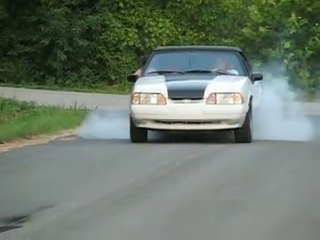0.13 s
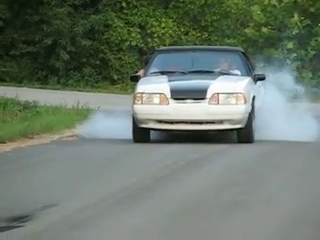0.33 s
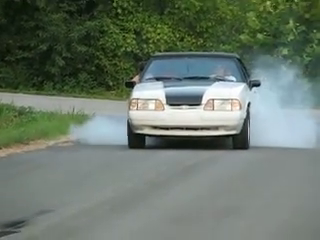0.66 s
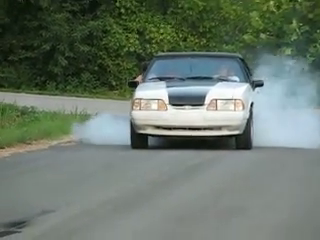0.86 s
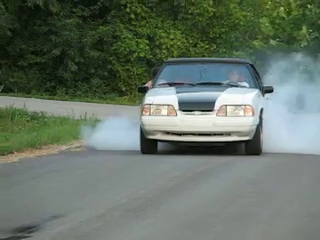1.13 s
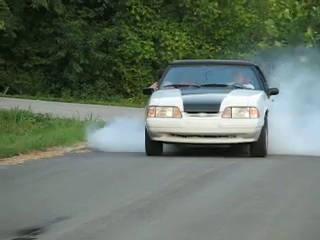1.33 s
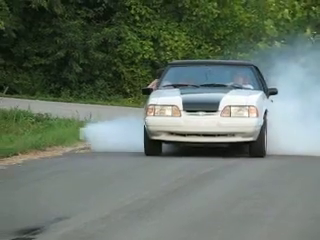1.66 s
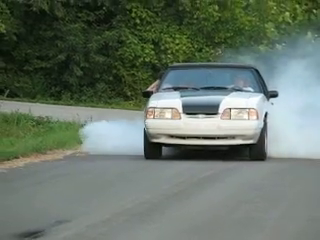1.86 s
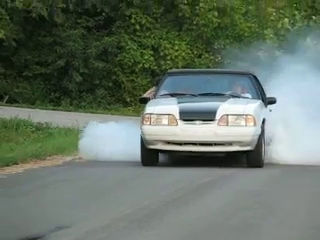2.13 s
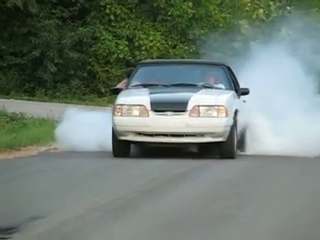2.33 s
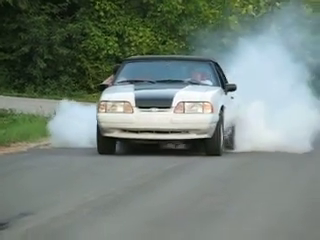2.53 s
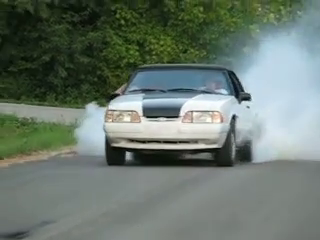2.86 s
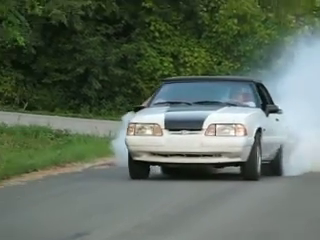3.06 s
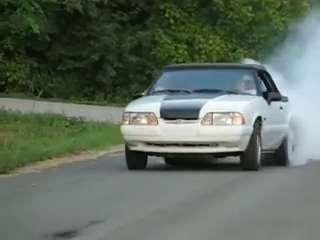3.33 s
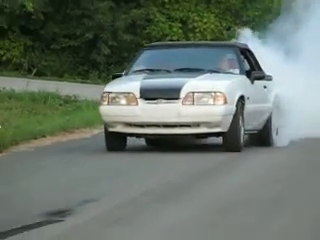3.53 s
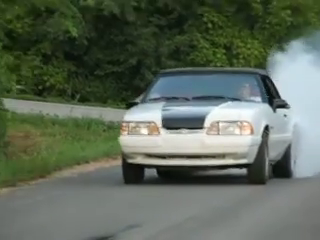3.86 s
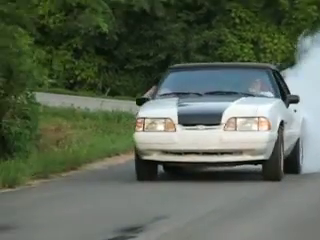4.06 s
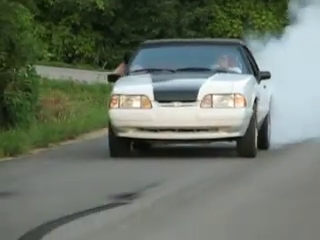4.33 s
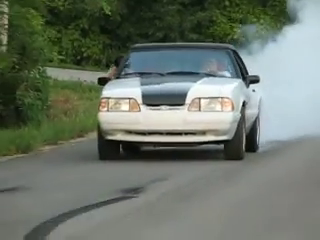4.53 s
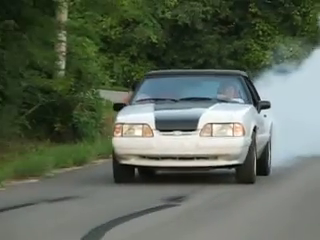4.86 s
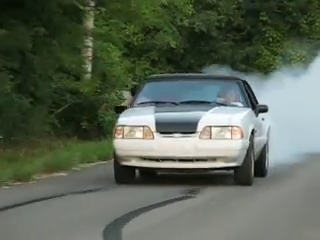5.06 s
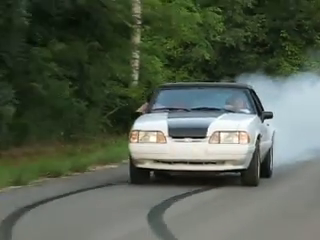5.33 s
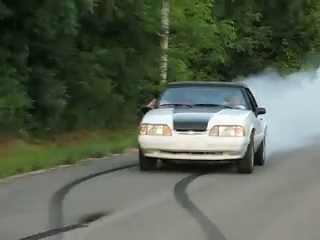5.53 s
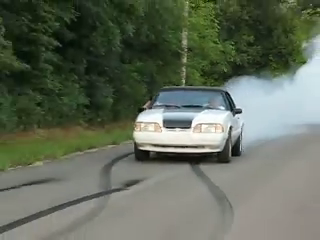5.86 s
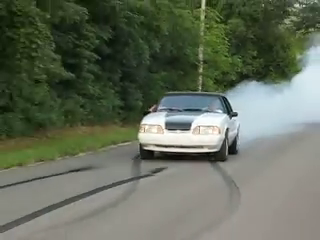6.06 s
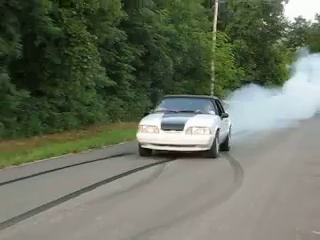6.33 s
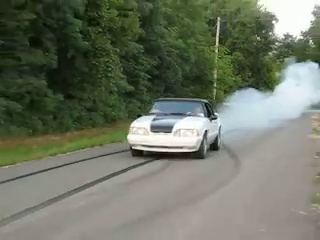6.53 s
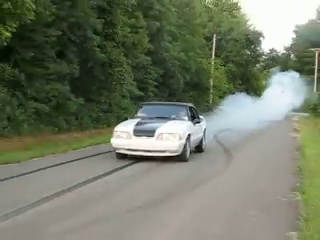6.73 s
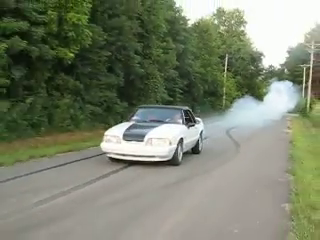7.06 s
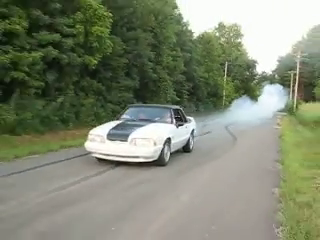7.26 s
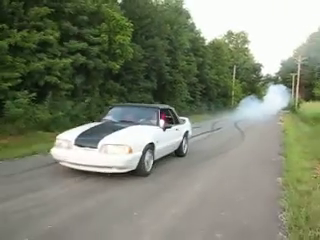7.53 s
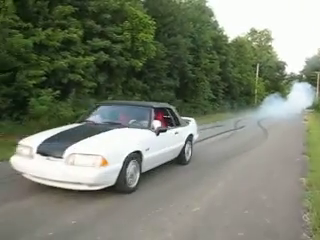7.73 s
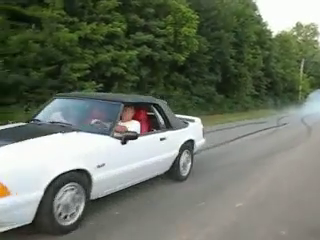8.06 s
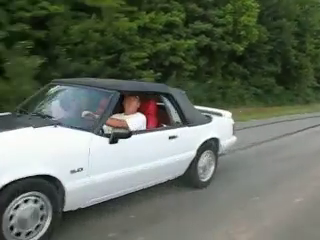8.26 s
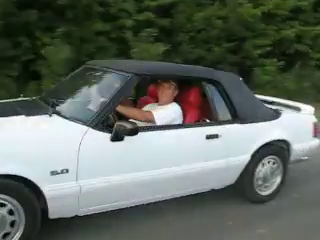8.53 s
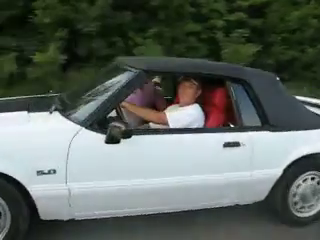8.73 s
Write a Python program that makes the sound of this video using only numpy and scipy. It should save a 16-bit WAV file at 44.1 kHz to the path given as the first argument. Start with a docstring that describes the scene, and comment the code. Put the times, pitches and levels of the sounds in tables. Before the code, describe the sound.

A car engine revs hard through a burnout, tyres roaring and squealing, then the car drives up and coasts past with a droning exhaust.

```python
"""A V8 engine revs up over the roar of its rear tyres spinning on a country road. The tyres squeal as they
grip again, then the car drives up and coasts past, its exhaust pipes droning in bursts.
The exhaust, fan and thin whines are tones that follow engine speed; burble, rumble, roar and hiss are
noise. The squeal is rubber sticking and slipping.
Two close microphone ports (openings) hear the bass alike and the treble differently."""
import sys
import numpy as np
from scipy import signal
from scipy.fft import rfft, irfft, next_fast_len
from scipy.io import wavfile
from scipy.ndimage import map_coordinates

SR = 44100
rng = np.random.default_rng(int(sys.argv[2]) if len(sys.argv) > 2 else 0)


def waveform_to_disk(signal):
    """Save audio, clipped to [-1, 1], as 16-bit WAV at the path in sys.argv[1]."""
    frames = np.transpose(np.atleast_2d(signal))
    scaled = np.clip(frames, -1, 1) * 32767
    samples = np.round(scaled).astype(np.int16)
    wavfile.write(sys.argv[1], SR, samples)


N = 392490
TIME = np.arange(N) / SR
PADDED = next_fast_len(N + 2000)
BINS_HZ = np.arange(PADDED // 2 + 1) * SR / PADDED + 1


def amp(db):
    """Turn decibels into a gain to multiply by."""
    return np.exp(np.asarray(db) * (np.log(10) / 20))


def rms_one(x):
    """Scale a signal to an average strength (rms) of 1."""
    return x / np.sqrt(np.mean(np.abs(x) ** 2) + 1e-20)


def in_time(rows):
    """Join a table's rows with straight lines: one curve for each column after the time."""
    times, *columns = np.transpose(rows)
    return [np.interp(TIME, times, column) for column in columns]


def at_hz(rows, hz):
    """Read between a table's rows on a musical (log) frequency scale."""
    frequencies, values = np.transpose(rows)
    return np.interp(np.log(hz), np.log(np.maximum(frequencies, 1)), values)


def span(start_s, end_s, fade_s):
    """A gain that fades in after the start and out before the end."""
    return np.clip(np.minimum(TIME - start_s, end_s - TIME) / fade_s, 0, 1)


def drift(rate_hz, size=N):
    """A smooth random wobble of typical size 1, worked out at every 20th sample."""
    r = np.exp(-2 * np.pi * rate_hz * 20 / SR)
    slow = signal.lfilter([1], [1, -2 * r, r * r], rng.standard_normal(N // 20 + 3002))[3000:]
    return np.interp(np.arange(size) / 20, np.arange(len(slow)), rms_one(slow))


def tone(turns, db, flutter_db):
    """A sine whose level flutters slowly and shivers fast; turns counts its cycles so far."""
    flutter = drift(2.34, len(turns)) + 0.58 * drift(25, len(turns))
    return np.sqrt(2) * amp(db + flutter_db * flutter) * np.sin(2 * np.pi * (turns + rng.random()))


def add_tone(out, start_s, end_s, fade_s, turns, db, flutter_db):
    """Mix in a tone that fades in and out."""
    part = slice(int(start_s * SR), int(end_s * SR))
    out[part] += span(start_s, end_s, fade_s)[part] * tone(turns[part], db, flutter_db)


# How alike noise is at the two ports: f/Hz, likeness (1 = the same)
LIKENESS = [(30, 0.91), (100, 1), (700, 0.995), (1200, 0.97), (1900, 0.93), (2500, .82), (4100, 0.72),
            (5300, .52), (8500, 0.5), (11000, .33), (15000, 0.2)]
def white():
    """Left and right spectra of white noise, less alike in the treble."""
    mid, side = rfft(rng.standard_normal((2, PADDED)))
    alike = np.clip(at_hz(LIKENESS, BINS_HZ), 0, 1)
    return np.sqrt(1 + alike) * mid + np.sqrt(1 - alike) * side * [[1], [-1]]


def noise(spectra, colour, flicker_db):
    """Give white noise a colour (its balance of low and high) and a flickering level."""
    coloured = irfft(amp(at_hz(colour, BINS_HZ)) * spectra, PADDED)[:, :N]
    return rms_one(coloured) * amp(flicker_db * drift(11.4))


# The cylinders firing: t/s, firing f/Hz, firing tone level/dB, its octave's level/dB
ENGINE = [(0, 197.6, -18.5, -57), (.3, 213, -26, -53), (.6, 234.9, -27, -42.5), (.95, 256.5, -23, -35),
          (1.36, 289, -28.5, -44), (1.55, 299.5, -23.5, -36), (1.8, 309.8, -26, -36),
          (1.97, 309, -25, -36.5), (2.15, 301, -23.5, -40), (2.5, 284.3, -27, -37), (2.8, 265.6, -33, -48),
          (3.3, 243.2, -39.5, -49), (3.77, 220.4, -46, -60), (4.05, 205.6, -27, -61), (4.2, 192, -17, -39),
          (4.36, 178, -9, -32), (4.5, 169.8, -11, -27.5), (4.66, 170.3, -10.5, -28),
          (4.9, 176.3, -9.5, -26), (5.3, 186.3, -13, -37.5), (5.58, 190.6, -14, -40),
          (5.88, 187.2, -11.5, -36.5), (6.03, 186.7, -14.5, -45), (6.45, 176.6, -14.5, -38),
          (6.64, 164.4, -11, -36), (6.8, 153.3, -14, -41), (7.0, 145, -16.5, -33.5),
          (7.24, 129.4, -20.5, -44), (7.4, 117.4, -27, -38), (7.84, 97.8, -32, -36), (8.3, 73.1, -35, -26),
          (8.6, 60.4, -26, -22.5), (8.9, 51.84, -19, -24.5)]
# Base level of the lesser engine tones and the fan: t/s, level/dB
LESSER_LEVEL = [(0, -21), (1, -19.5), (2.5, -19.5), (2.9, -26), (3.5, -39), (4.4, -31.5), (5.1, -31),
                (6, -26), (6.9, -27), (7.8, -24.5), (8.9, -26)]
# Lesser engine tones: order (cycles per two engine turns), relative level/dB
LESSER_ORDERS = [(1, 2), (2, 4), (3, 0), (4, -2), (5, -2), (6, 4), (7, -7), (9, -2), (10, -6), (11, -8),
                 (12, -2), (13, -7), (14, 2), (15, -8), (17, -9), (18, 2), (19, -10), (20, 2), (21, -8),
                 (22, -1), (23, 4), (24, 0), (26, 2), (32, -3)]
# How the exhaust pipe colours those tones: f/Hz, relative level/dB
PIPE_COLOUR = [(20, -21), (60, -11), (110, -15.5), (160, 3), (200, -5.5), (300, -1.5), (400, -14.5),
               (560, -17), (690, -5.5), (780, -12.5), (880, -12.5), (980, -15)]
def exhaust(firing_hz, firings):
    """Eight firings every two engine turns make a note, with lesser tones around it and overtones."""
    _, firing_db, octave_db = in_time(ENGINE)
    lesser_db = in_time(LESSER_LEVEL)[0] - 10
    out = tone(firings, firing_db, flutter_db=0.5) + tone(2 * firings, octave_db, flutter_db=1.5)
    for order, db in LESSER_ORDERS:
        ratio = order / 8
        out += tone(ratio * firings, lesser_db + db + at_hz(PIPE_COLOUR, ratio * firing_hz), flutter_db=2)
    return out


# The fan's overtones: multiple of the blade rate, relative level/dB
FAN_OVERTONES = [(2, -3.5), (3, -14), (4, -12), (5, -11.5), (6, -9.5), (7, -9.5)]
# How the housing round the fan colours them: f/Hz, relative level/dB
HOUSING_COLOUR = [(200, 0), (320, -14.5), (385, -2.5), (430, -14.5), (570, -5.5), (800, -6), (950, -13.5),
                  (1300, -20)]
def fan(firing_hz, firings):
    """The cooling fan's passing blades hum; their lowest tone grows with engine speed."""
    blades_per_firing, full_speed_hz, db_per_octave = .669, 310, 3.5
    base_db = in_time(LESSER_LEVEL)[0]
    blade_db = base_db - 5.5 + db_per_octave * np.log2(firing_hz / full_speed_hz)
    out = tone(blades_per_firing * firings, blade_db, flutter_db=2.5)
    for multiple, db in FAN_OVERTONES:
        ratio = multiple * blades_per_firing
        housing_db = at_hz(HOUSING_COLOUR, ratio * firing_hz)
        out += tone(ratio * firings, base_db + db + housing_db, flutter_db=2.94)
    return out


# The two low noises: t/s, burble base level/dB, rumble level/dB
LOW_LEVELS = [(0, -28, -52), (1.7, -42, -43), (2.5, -43, -46), (2.9, -26, -50), (3.35, -34, -66),
              (3.9, -31.5, -52), (4.5, -32, -48), (5.1, -32, -42), (5.6, -27, -35), (6.1, -27, -40),
              (6.8, -28, -33), (7.08, -24, -34), (7.3, -17, -30), (7.55, -31, -34), (8, -17.5, -33),
              (8.35, -30, -26), (8.9, -22, -30)]
# Notes the pipes ring at: f/Hz, width/Hz, relative level/dB
PIPE_RINGS = [(170.9, 6.9, -3.5), (275, 53, -7), (373, 83, -46)]
def burble():
    """Uneven burning makes lumpy noise that sets the pipes ringing."""
    level_db, _ = in_time(LOW_LEVELS)
    lumps = rng.standard_normal(N) * amp(1.5 * drift(20))
    out = np.zeros(N)
    for hz, width_hz, db in PIPE_RINGS:
        r = np.exp(-np.pi * width_hz / SR)
        ring = signal.lfilter([1, 0, -1], [1, -2 * r * np.cos(2 * np.pi * hz / SR), r * r], lumps)
        out += amp(db) * rms_one(ring)
    return amp(level_db) * signal.sosfilt(signal.butter(2, 700, fs=SR, output="sos"), out)


# Colour of the rumble: f/Hz, relative level/dB
RUMBLE_COLOUR = [(18, -7), (30, -12), (60, 7.5), (120, 2), (250, -1), (400, 2.5), (600, -29)]
def rumble(spectra):
    """Deep noise that swells and sinks under the engine."""
    _, level_db = in_time(LOW_LEVELS)
    return amp(level_db) * noise(spectra, RUMBLE_COLOUR, flicker_db=1)


# The two broad noises: t/s, roar level/dB, hiss level/dB
BROAD_LEVELS = [(0, -22.5, -26), (.38, -20.5, -23), (1, -20.5, -24), (1.8, -21, -23.5), (2.45, -21, -22.5),
                (2.7, -22.5, -26), (2.97, -37, -30), (3.69, -40, -34), (3.92, -35, -35.5),
                (4.3, -35.5, -31.5), (5.1, -34, -32.5), (5.55, -28, -25.5), (5.85, -28.5, -26),
                (6.15, -24, -26), (6.52, -24, -25), (6.69, -27.5, -30), (6.89, -23, -26.5),
                (7.61, -24.5, -26), (7.86, -21.5, -22.5), (8.06, -22, -23.5), (8.3, -23.5, -23.5),
                (8.6, -24.5, -22.5), (8.9, -25, -24)]
# One colour a stage (spin-up, full spin, pulling away, coasting, passing): f/Hz, relative level/dB
ROAR_COLOURS = [
    [(190, -22), (330, 0), (374, -26), (459, -7.5), (617, -15), (691, -3.5), (929, -12), (1090, -1.5),
     (1350, -1), (1640, -10.5), (1900, -6.5), (5000, -19), (6500, -39), (11000, -120)],
    [(190, -15), (330, 0.5), (357, -13), (396, -4), (454, -7.5), (766, -2), (1060, -7), (1340, -1),
     (1590, -6.5), (1990, -3.5), (2200, -5), (5000, -12), (6500, -40), (11000, -120)],
    [(250, -32), (420, -19), (533, -1.5), (841, 2.5), (1080, -3), (1350, 1.5), (1700, -5), (2090, -2.5),
     (2470, -10.5), (3140, -10), (5000, -16.5), (6500, -36), (11000, -120)],
    [(250, 1), (420, -1), (528, -31), (591, -7), (877, 1.5), (1310, -8), (1570, -3.5), (1910, -8.5),
     (2200, -7), (2630, -12.5), (5000, -15.5), (6500, -59), (11000, -120)],
    [(190, -18), (330, -1.5), (439, -6), (646, -12), (707, -15.5), (1030, -10), (1140, -14), (1310, -11.5),
     (1500, -16), (2160, -14.5), (3030, -17), (3280, -17), (5000, -17), (6500, -51), (11000, -120)],
]
# When the colour starts or stops changing: t/s
STAGE_TIMES = [.5, 1.7, 2.6, 2.95, 6.4, 7.1, 7.6, 7.95]
# The stage at each of those times: number, from 0
STAGES = [0, 1, 1, 2, 2, 3, 3, 4]
def roar():
    """Noise from the tyre tread and the engine's air intake, blending from one colour to the next."""
    level_db, _ = in_time(BROAD_LEVELS)
    stage, spectra = np.interp(TIME, STAGE_TIMES, STAGES), white()
    return amp(level_db) * sum(np.clip(1 - abs(stage - k), 0, 1) * noise(spectra, colour, flicker_db=0.75)
                               for k, colour in enumerate(ROAR_COLOURS))


# Colour of the hiss: f/Hz, relative level/dB
HISS_COLOUR = [(2240, -13.5), (3800, -4), (4840, -5.5), (5300, -1.5), (7030, 2), (7400, -1.5), (9310, -22),
               (11400, -24), (15000, -37)]
def hiss(spectra):
    """Bright noise on top of the roar."""
    _, level_db = in_time(BROAD_LEVELS)
    return amp(level_db) * noise(spectra, HISS_COLOUR, flicker_db=0.75)


# How hard the tread slips: t/s, squeal base level/dB, scrub level/dB
SLIP = [(2.4, -24, -21), (2.5, -20, -22), (2.62, -16.5, -30), (2.69, -16, -25), (2.745, -24, -26),
        (2.8, -14.5, -21.5), (3.1, -15.5, -18), (3.55, -17, -17.5), (3.88, -20.5, -19.5), (4.05, -20, -20),
        (4.3, -30.5, -28.5), (4.5, -50, -34), (4.6, -52, -49)]
# Squealing tread blocks: start t/s, end t/s, start f/Hz, settled f/Hz, start and end relative level/dB
SQUEALS = [(2.57, 4.45, 2080, 1735, -1.5, -6), (2.46, 3.04, 1785, 1705, -1, -2.5),
           (2.98, 3.54, 1730, 1700, -9, -23), (2.9, 4.45, 1515, 1405, -11.5, -4.5),
           (2.86, 4, 2480, 2330, -12, -25.5), (3.05, 3.55, 3250, 2950, -14, -6.5),
           (3.05, 3.5, 4480, 4800, -22, -23), (0.26, 0.44, 1310, 760, -5, -4),
           (0.31, 0.49, 1100, 1070, -4, -4), (1.1, 2.2, 1355, 1370, -7, -6)]
# How each squeal breaks up: relative depth, wobble f/Hz
BREAKUP = [(.25, 60), (.4, 60), (.7, 60), (.45, 30), (1.6, 90), (1.6, 130), (2.5, 200), (.2, 30), (.2, 30),
           (.5, 30)]
# Grip coming and going: t/s, factor on that depth
RAGGEDNESS = [(2.4, 2), (2.9, 2.2), (3.05, .7), (3.75, .8), (4, 2.2), (4.5, 2.5)]
def squeal():
    """Tread blocks stick and slip, making ragged tones whose pitch settles as the tyres slow."""
    settle_s = .55
    out, ragged = np.zeros((2, N)), in_time(RAGGEDNESS)[0]
    base_db, _ = in_time(SLIP)
    for (start, end, start_hz, settled_hz, start_db, end_db), (depth, wobble_hz) in zip(SQUEALS, BREAKUP):
        hz = settled_hz + (start_hz - settled_hz) * np.exp(-np.maximum(TIME - start, 0) / settle_s)
        turns = np.cumsum(hz * (1 + .004 * ragged * drift(15))) / SR
        note = np.exp(2j * np.pi * turns)
        broken = depth * ragged
        wobble = drift(wobble_hz) + 1j * drift(wobble_hz)   # complex: shakes both strength and pitch
        shake = (1 + broken * wobble) / np.sqrt(1 + 2 * broken ** 2)
        db = base_db + np.interp(TIME, [start, end], [start_db, end_db]) + 0.57 * drift(5)
        gain = np.sqrt(2) * span(start, end, fade_s=0.074) * amp(db)
        for side in (0, 1):
            fuzz = 0.22 * drift(110)   # reaches each port by its own path
            out[side] += gain * np.real((shake + fuzz) * note)
    # The slip is lopsided, which adds octaves and tones at the sum of two pitches.
    overtones = signal.sosfilt(signal.butter(2, 2600, "high", fs=SR, output="sos"), out ** 2)
    return out + 0.65 * overtones


# Thin whines and engine tones: start t/s, end t/s, firing-rate multiple at start, at end, peak level/dB
THIN_TONES = [(1.15, 1.6, 6.68, 6.62, -32), (1.55, 1.85, 6.68, 6.7, -37), (1.84, 2.5, 6.62, 7.2, -36),
              (1.4, 1.75, 15.3, 14.4, -42), (1.25, 1.6, 18.5, 18.4, -38), (1.55, 2.15, 17.25, 17.25, -34),
              (1.5, 2.1, 9.0, 9.0, -36), (1.95, 2.3, 14.15, 14.6, -37), (2.4, 2.95, 3.27, 3.3, -33.5),
              (2.28, 2.65, 18.3, 19.1, -36), (6, 6.6, 17.1, 17, -39.5), (7.851, 8.352, 7.4, 7.26, -29.5)]
def thin_tones(firing_hz):
    """Thin whines and engine tones that swell and fade, following engine speed."""
    out = np.zeros(N)
    for start, end, first, last, db in THIN_TONES:
        turns = np.cumsum(firing_hz * np.interp(TIME, [start, end], [first, last])) / SR
        add_tone(out, start, end, (end - start) / 3, turns, db, flutter_db=2.5)
    return out


# Colour of scrubbing rubber: f/Hz, relative level/dB
SCRUB_COLOUR = [(590, -61), (1000, -26), (1130, -17), (1230, -8), (1330, -6), (1410, -7), (1530, -2),
                (1780, 6), (1860, 2), (2200, -21.5), (2570, -10.5), (3060, -5), (3640, -5.5), (4000, -20),
                (5000, -17.5), (6500, -30), (11000, -120)]
def scrub():
    """Slipping rubber scrubs the road, making noise under the squeal."""
    _, level_db = in_time(SLIP)
    fade = span(SLIP[0][0], SLIP[-1][0], fade_s=0.27)
    return fade * amp(level_db) * noise(white(), SCRUB_COLOUR, flicker_db=1.37)


# Bursts of pipe tone: start t/s, length/s, f/Hz, level/dB
DRONE_BURSTS = [(6.884, 0.13, 158.2, -17.5), (7.057, .12, 158, -22), (7.073, .08, 291, -24),
                (7.227, .14, 156.2, -16.5), (7.408, .22, 157.2, -12.5), (7.486, 0.063, 291, -21),
                (7.602, .24, 290.4, -26), (7.62, .22, 157, -24), (7.886, 0.2, 160.6, -19),
                (7.878, 0.043, 291.6, -15), (7.927, 0.11, 291, -29), (8.137, .17, 157, -17.5),
                (8.134, .15, 291, -24), (8.4, 0.46, 156.4, -28), (8.743, 0.096, 291, -22.5),
                (8.82, .12, 156.4, -20)]
def drone():
    """With the driver's foot off the pedal, the pipes drone in bursts at their own wavering pitch."""
    out, fade_s = np.zeros(N), 0.033
    wavering_time = np.cumsum(1 + 0.01196 * drift(4.13)) / SR
    for start, length, hz, db in DRONE_BURSTS:
        add_tone(out, start, start + length, fade_s, hz * wavering_time, db, flutter_db=0.6)
    return out


def scene():
    """All the car's sounds added together, left and right."""
    firing_hz = in_time(ENGINE)[0]
    firings = np.cumsum(firing_hz * (1 + .002 * drift(7.7))) / SR   # running count, slightly unsteady
    engine = exhaust(firing_hz, firings) + fan(firing_hz, firings) + burble()
    spectra = white()
    noises = rumble(spectra) + roar() + hiss(spectra)
    return engine + noises + squeal() + thin_tones(firing_hz) + scrub() + drone()


# How much louder the left port is than the right: f/Hz, level/dB
PORT_BALANCE = [(60, 0.77), (1400, -0.5), (1900, -1), (2500, -7), (3200, -6), (4100, 2), (5300, 2),
                (6700, 1), (8500, -5.5), (10700, 6.5), (13500, 1)]
# How far the left port's wave is ahead: f/Hz, phase/radians
PORT_PHASE = [(20, -0.06), (900, -0.06), (1400, -0.17), (1900, -0.53), (2500, -0.5), (3200, .55),
              (4100, 0.72), (5300, 0.63), (6700, 0.5), (8500, 0.1), (10700, 0.8), (13500, 0)]
def record(dry):
    """The two ports differ in colour and timing; peaks are rounded and the highest treble is cut."""
    passing_s, left_lead_s, cutoff_hz = (7.5, 8.8), 85e-6, 15660
    # The passing car swings to the left, so its sound reaches that port first.
    shift = np.interp(TIME, passing_s, [0, left_lead_s * SR / 2])
    arrived = [map_coordinates(port, [np.arange(N) + sign * shift], order=3, mode="mirror")
               for port, sign in zip(dry, (1, -1))]
    left_gain = amp(at_hz(PORT_BALANCE, BINS_HZ) / 2) * np.exp(.5j * at_hz(PORT_PHASE, BINS_HZ))
    padded = np.pad(arrived, ((0, 0), (1000, PADDED - N - 1000)), "reflect")
    ports = irfft(rfft(padded) * [left_gain, 1 / left_gain], PADDED)[:, 1000:N + 1000]
    rounded = 1.2 * np.tanh(ports / 1.2)
    return signal.sosfilt(signal.cheby2(16, 50, cutoff_hz, fs=SR, output="sos"), rounded)


dry = scene()
out = record(dry)
waveform_to_disk(out)
```